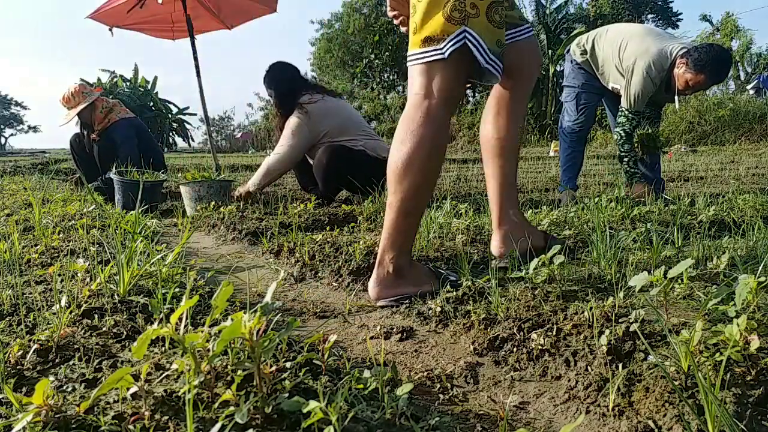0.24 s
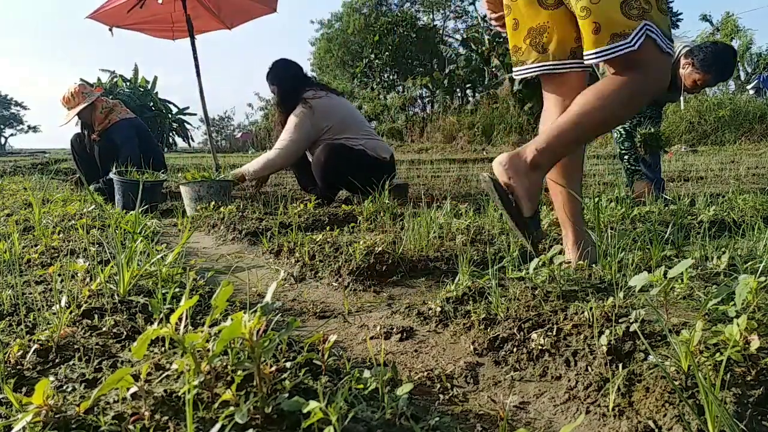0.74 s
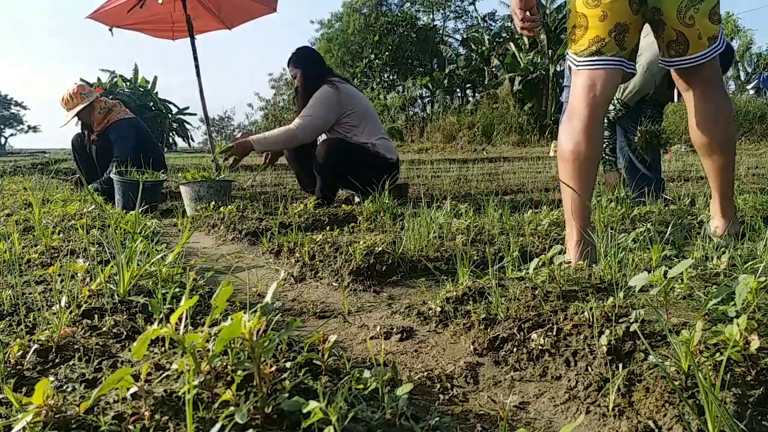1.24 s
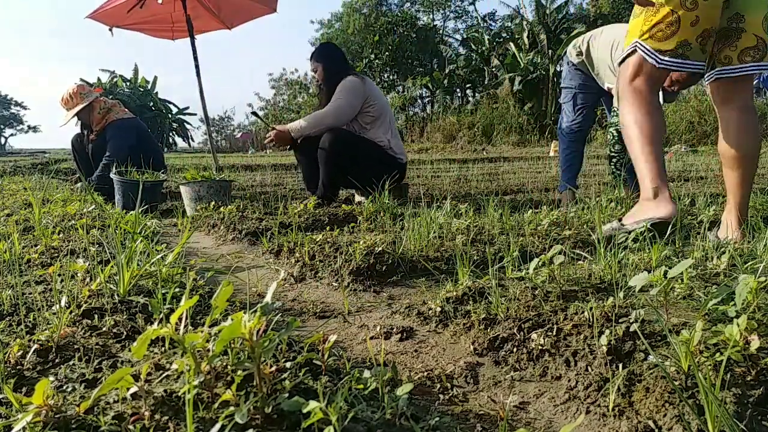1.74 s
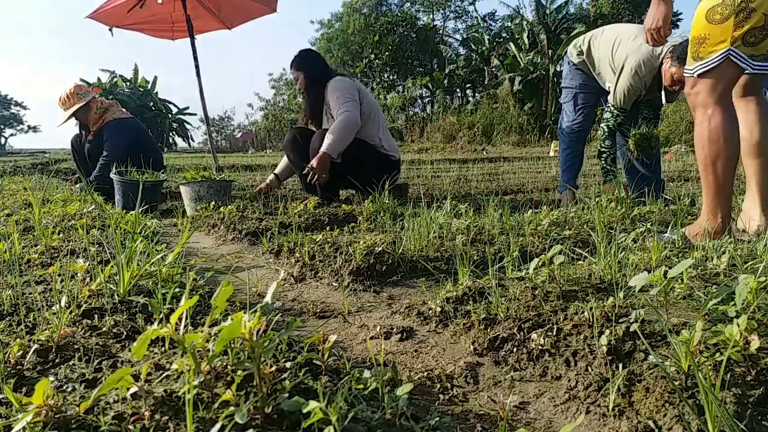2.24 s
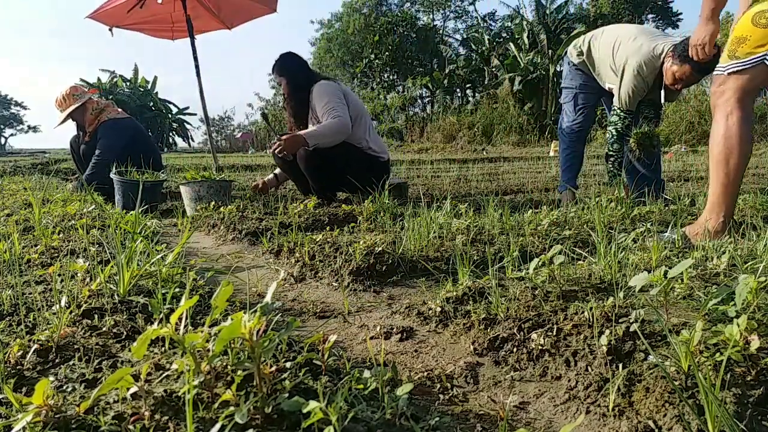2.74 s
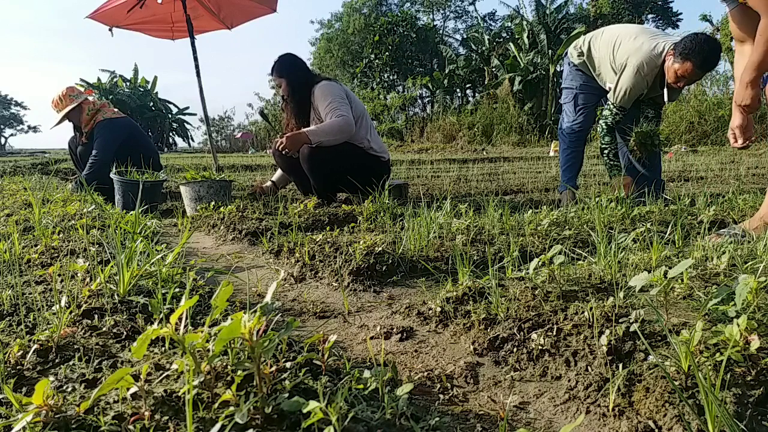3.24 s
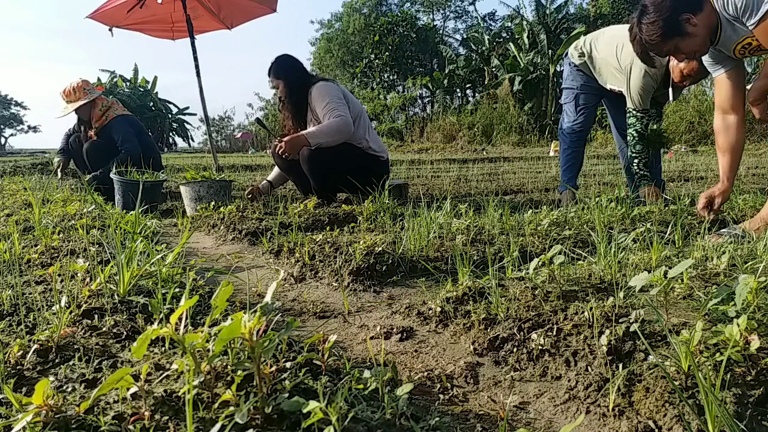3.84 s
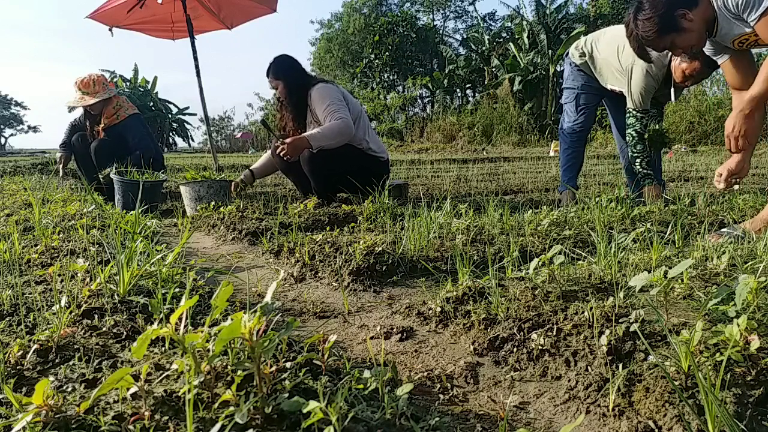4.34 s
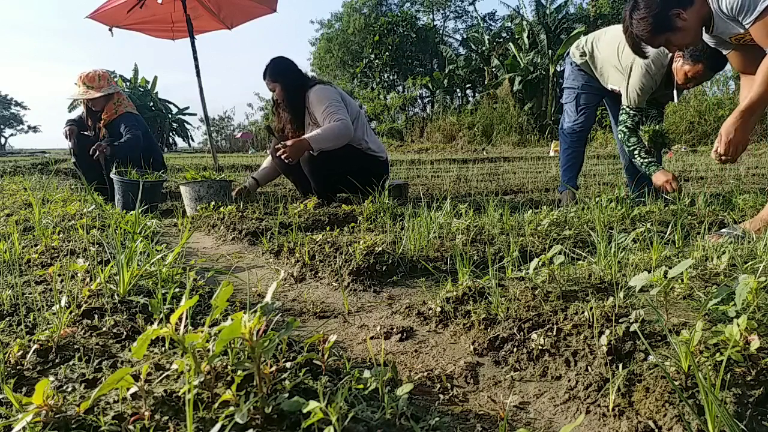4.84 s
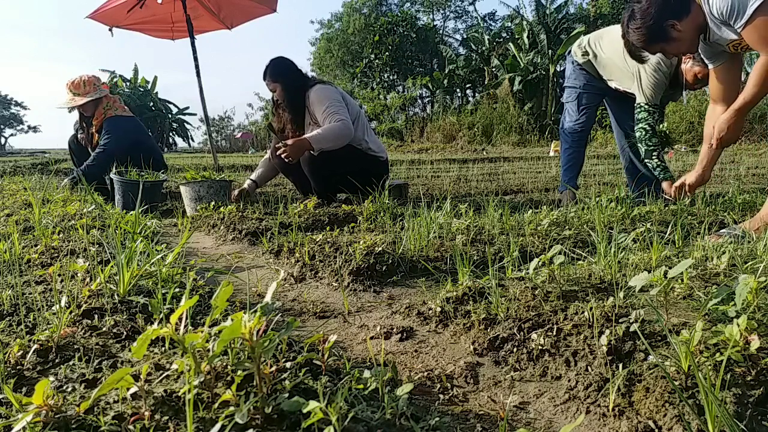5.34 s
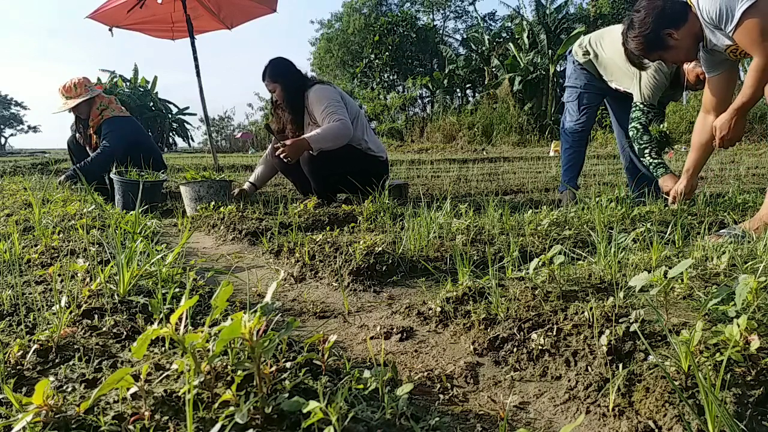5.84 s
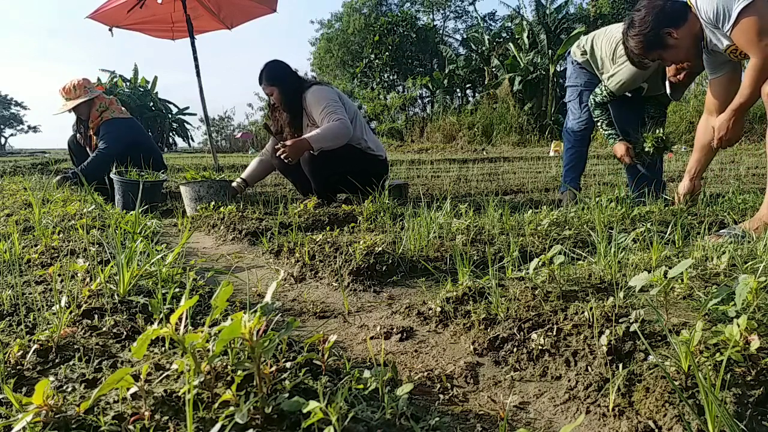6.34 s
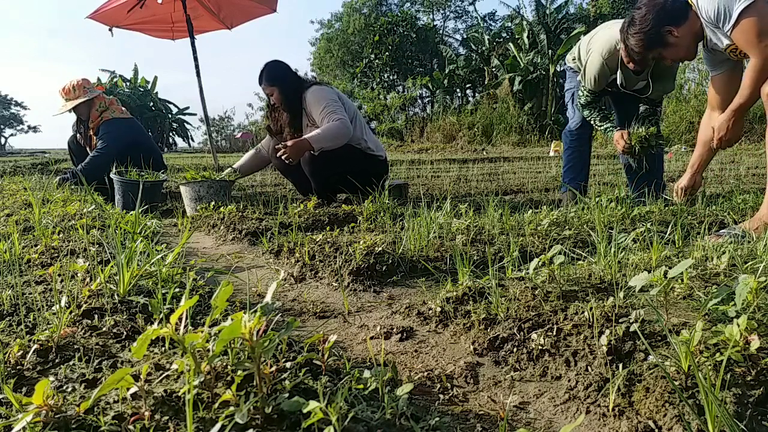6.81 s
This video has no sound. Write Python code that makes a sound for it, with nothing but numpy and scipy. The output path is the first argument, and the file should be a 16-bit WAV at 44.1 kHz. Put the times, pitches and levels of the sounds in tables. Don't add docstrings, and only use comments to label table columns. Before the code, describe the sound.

A buzzing small engine dominates at first, hum and gassy roar mixed with rattling panels, while stalks crack near the microphone. It gradually slows and softens, and leaves rustle close by around three seconds. The idle falters with missed firings, then the engine catches and rises unevenly, its drive whining. A short bird twitter and chattering loose bracket come late. Open field, wide stereo phone pickup, high thin insect song and light hiss.

```python
import sys
import numpy as np
from scipy import signal
from scipy.fft import rfft, irfft
from scipy.io import wavfile
from scipy.ndimage import uniform_filter1d, map_coordinates

SR = 44100
rng = np.random.default_rng(int(sys.argv[2]) if len(sys.argv) > 2 else 0)


def undo_db(level):
    steps = np.asarray(level, float) / 20
    return 10 ** steps


def store_pcm(level_fs):
    pcm = np.round(np.clip(level_fs, -1, 1) * 32767).astype(np.int16)
    wavfile.write(sys.argv[1], SR, np.atleast_2d(pcm).T)


N = 311787
T = np.arange(N) / SR
HZ = np.maximum(np.fft.rfftfreq(N, 1 / SR), 1)

# f/Hz, spectral level/dB
HISS = [(40, -9), (300, -47), (1500, -6.5), (4000, -7), (6400, -14), (8000, -8), (15500, -8.5)]
# f/Hz, gain/dB
LEFT_PORT = [(50, .1), (130, -1), (300, -.9), (700, .6), (1200, 1), (1720, -5), (2400, -2), (3300, -3),
             (5000, -7), (6900, 1), (7600, 3), (9000, 0)]
# f/Hz, direct share/1
DIRECT = [(60, 0.98), (130, .97), (350, 0.995), (700, .97), (1200, 0.88), (1700, 0.82), (2400, 0.67),
          (3300, 0.55), (4300, 0.5), (7000, 0.17)]
# t/s, start f/Hz, end f/Hz, length/s, level/dB
BIRD = [
    (5.824, 3700, 2880, 0.024, -42),
    (5.843, 3380, 3730, 0.016, -47),
    (5.863, 2950, 3400, 0.0049, -44),
    (5.871, 3690, 2920, 0.0155, -47),
    (5.891, 2780, 3230, .014, -53),
    (5.907, 3130, 3320, 0.0091, -46),
    (5.918, 3500, 2950, .015, -49),
]
# f/Hz, spectral level/dB
BRUSH_COLOUR = [(1600, -4), (2900, -0.5), (3300, 7), (4100, 6), (5200, 4.5), (6500, -7.5), (7800, -4.5),
                (9500, 0), (14000, -39)]
# peak t/s, level/dB, swell/s, fade/s
STROKES = [(0.459, -43, 0.028, 0.054), (2.06, -57, .03, .06), (2.178, -62, .015, 0.021),
           (2.286, -52.5, 0.2, 0.026), (2.474, -52.5, 0.22, 0.12), (2.552, -55, 0.027, 0.038),
           (2.825, -55, 0.025, 0.15), (2.973, -44.5, 0.056, 0.02), (3.178, -41, 0.047, 0.018),
           (3.198, -37, .004, .004), (3.212, -41, 0.012, 0.0083), (3.23, -57, 0.019, 0.036)]
# t/s, peak level/dB, left-right level/dB, ring start f/Hz, ring end f/Hz, ring share/1
SNAPS = [
    (.4415, -19.5, -3, 4500, 5000, 0),
    (.4565, -31, -2, 3200, 3600, .2),
    (1.4603, -22, -1, 3900, 3400, .75),
    (1.4606, -27, -1, 1600, 1500, .6),
    (1.493, -35, -1, 5000, 5000, .9),
    (1.4628, -25.5, -1, 2800, 3500, 1),
    (2.8215, -40, -5, 4500, 5000, .1),
    (3.1965, -34, -2, 3200, 3600, .2),
]
# t/s, f/Hz, level/dB
WHINE = [(3.1, 445, -62), (3.3, 432, -48.5), (3.62, 420, -52.5), (3.72, 415, -68.5), (5.2, 400, -76),
         (5.36, 405, -43), (5.45, 420, -45), (5.65, 437, -44), (6.0, 430, -45), (6.3, 407, -41),
         (6.6, 404, -50), (6.8, 412, -46), (7.07, 430, -37.5)]
# t/s, f/Hz, level/dB
BRACKET = [(6.15, 3580, -58), (6.206, 3480, -47), (6.19, 3300, -53), (6.24, 3050, -53), (6.27, 3600, -54),
           (6.174, 2720, -61), (6.188, 2840, -53), (6.206, 2820, -48), (6.217, 2800, -51),
           (6.23, 2560, -54), (6.25, 2550, -52), (6.273, 2380, -50.5), (6.294, 2420, -49),
           (6.332, 3670, -54), (6.316, 2400, -47), (6.378, 3700, -54)]
# t/s, peak level/dB, panel f/Hz
KNOCKS = [(0.0657, -32, 1800), (0.0992, -31, 1770), (0.1311, -32, 1550), (0.165, -29, 1760),
          (0.1974, -32, 1730), (0.2299, -28, 2030), (0.4244, -26, 1910), (0.6205, -23, 1580),
          (1.0848, -29, 1730), (1.1187, -28, 1560), (1.1531, -30, 2030), (1.2045, -29, 1530),
          (1.2239, -22, 1810), (1.2569, -27, 1750), (1.2928, -27, 2040), (1.3462, -30, 2050),
          (1.5422, -33, 1690), (1.6515, -33, 1710), (1.7059, -35, 1630), (2.4661, -33.5, 1580),
          (2.533, -41, 1650), (2.6233, -42, 1670), (2.7166, -34, 1570), (2.739, -39, 1580),
          (4.7314, -52, 2180), (4.7754, -50, 1580), (5.3471, -46, 2310), (5.382, -45, 2790),
          (5.4439, -45, 1540), (5.4733, -40, 2330), (5.5047, -38, 2340), (5.594, -36, 1660),
          (5.6225, -33, 1900), (5.6474, -37, 2340), (5.6758, -36, 1680), (5.7033, -37, 2260),
          (6.1438, -42, 2200), (6.1732, -35, 1760), (6.2061, -34, 1630), (6.4281, -37, 2370),
          (6.463, -38, 2330), (6.5281, -42, 1570), (6.5568, -38, 2370), (6.6556, -42, 1510),
          (6.689, -37, 1570), (6.692, -38, 2850), (6.7195, -42, 2310), (6.7521, -42, 2260),
          (6.7853, -37, 1700), (6.8162, -40, 1940), (6.8344, -41, 2470), (6.909, -43, 1690),
          (6.94, -35, 2380), (7.0614, -39, 2820)]
# f/Hz, width/Hz, level part that grows with speed/dB, level part that shrinks with speed/dB
PANELS = [(1290, 90, -14, -5), (1080, 130, -15, -2), (1583, 110, 3, 0.5), (1790, 170, 3.5, -3),
          (2075, 55, 3.5, -7), (2370, 150, -7, -2.5), (2560, 65, 5, -18), (2800, 120, -7, -4),
          (3110, 90, .5, -16), (3620, 150, -12, -3)]
# f/Hz, spectral level/dB
CLATTER = [(700, -79), (1000, 6), (1500, 0.5), (2200, -8), (3000, -5.5), (3900, -2.5), (4400, -19),
           (8000, -89)]
# t/s, peak level/dB, f/Hz
BARKS = [(0.015, -26, 640), (0.057, -27, 611), (0.096, -33, 490), (0.146, -16.5, 657), (0.196, -23, 680),
         (0.276, -18, 622), (0.344, -19, 690), (0.424, -32, 645), (0.457, -33, 626), (0.555, -23, 480),
         (0.62, -24, 630), (0.659, -26, 510), (0.733, -26, 615), (0.799, -25, 509), (0.865, -27, 649),
         (0.931, -29, 500), (1.017, -20, 654), (1.056, -26, 638), (1.117, -16.5, 620), (1.227, -17, 620),
         (1.298, -35, 630), (1.329, -19, 482), (1.37, -34, 625), (1.424, -35, 694), (1.472, -29, 590),
         (1.544, -23, 617), (1.616, -24, 608), (1.663, -21, 633), (1.724, -23, 527), (1.782, -22.5, 606),
         (1.843, -26, 517), (1.94, -25, 563), (2.04, -22, 480), (2.184, -33, 635), (2.536, -32, 603),
         (2.611, -25, 570), (2.671, -25, 606), (2.716, -20, 594), (2.811, -26, 630), (2.907, -26, 590),
         (4.775, -37, 560), (5.413, -28, 576), (5.506, -22.5, 596), (5.54, -24.5, 570), (5.591, -25, 646),
         (6.176, -29, 573), (6.333, -32, 590), (6.404, -30, 641), (6.462, -24, 643), (6.532, -25, 640),
         (6.59, -42, 579), (6.658, -25, 600), (6.69, -22, 600), (6.752, -33, 567), (6.829, -23.5, 700),
         (6.915, -23, 595)]
# t/s, turns per second/Hz
SPEED = [(0.0, 61.53), (0.5, 61.31), (1.0, 60.07), (1.25, 56.37), (1.5, 56.45), (1.75, 52.63), (2.0, 49.21),
         (2.75, 42.94), (3.5, 35.31), (4.3, 25.72), (4.5, 26.48), (4.8, 28.77), (5.25, 29.44),
         (5.75, 37.26), (6.0, 32.75), (6.25, 31.25), (6.6, 30.94), (7.07, 32.29)]
# t/s, gas flow as roar level/dB, strain as clatter level/dB, firmness as hum against flow/dB
LOAD = [(0.0, -27, -45.5, 1.5), (0.6, -25.5, -39, 1.5), (1.3, -26, -42, 2.5), (1.72, -26.5, -49.5, 1),
        (1.8, -27, -53.5, -2.5), (2.43, -31.5, -58, -7.5), (2.49, -29, -50.5, -4), (2.93, -30, -56, -2.5),
        (3.03, -34.5, -61.5, -5), (3.65, -39.5, -85, 0), (4.3, -45.5, -68, 7), (4.84, -35.5, -70, 2),
        (5.3, -37.5, -65.5, -2.5), (5.38, -33.5, -53, -5.5), (5.7, -31.5, -44, 2.5), (5.78, -34.5, -67, -2),
        (6.17, -32, -48.5, -1.5), (7.07, -32.5, -52, -2.5)]
# t/s, length/s, loss/dB
MISSES = [(2.096, 0.11, 2), (2.762, 0.022, 1), (2.86, 0.035, 0.5), (3.693, 0.28, 7.5), (3.72, 0.023, 1),
          (4.335, .03, 2), (4.06, 0.066, 2), (4.157, 0.051, 4), (4.202, .03, 2.5), (4.27, 0.098, 3.5),
          (4.385, 0.07, -2), (4.467, 0.016, -3.5), (4.491, 0.053, -4), (4.57, 0.063, 3), (4.718, 0.137, -1),
          (4.891, 0.073, 4), (4.975, 0.11, 4), (5.1, .08, 0), (5.2, 0.1, 0), (5.428, .04, 2),
          (5.78, .05, -1), (5.828, 0.056, -2), (5.9, 0.038, 3), (6.01, 0.11, 3), (6.52, .05, 0.5),
          (6.618, 0.022, 2)]
# f/Hz, width/Hz, level/dB
HUM = [(55.3, 1.6, -7.5), (63.8, 5.3, -1.5), (90.5, 8.8, 2), (126.8, 22, -6.5), (162.3, 7.1, -7.5),
       (201.1, 5.3, 1), (243.8, 6, -7), (319, 17, -2)]
ORDER_DB = [-1, 2.5, -0.5, -3, -4.5]
# f/Hz, spectral level/dB
ROAR = [(24, -39), (40, -60), (64, 4.5), (87, -2), (218, -5), (285, -6), (384, -7.5), (524, -13.5),
        (600, -7), (728, -18.5), (844, -14.5), (1040, -18.5), (1400, -20), (1820, -31), (3080, -120)]
# f/Hz, width/Hz, level/dB
PIPE = [(164, 26, -2), (266.6, 4.7, -5.5), (303.4, 15.7, -3), (430, 34, -9), (654, 152, -6),
        (951, 3.9, -19)]


def rms_one(x):
    return x / np.sqrt(np.mean(x ** 2) + 1e-20)


def in_time(rows):
    s, *columns = np.transpose(rows)
    return [np.interp(T, s, c) for c in columns]


def at_hz(points, hz):
    points_hz, values = np.transpose(points)
    return np.interp(np.log(hz), np.log(points_hz), values)


def colour(x, points):
    return irfft(rfft(x) * undo_db(at_hz(points, HZ)), N)


def butter(x, order, hz, kind="band"):
    return signal.sosfilt(signal.butter(order, hz, kind, fs=SR, output="sos"), x)


def resonate(x, hz, width_hz):
    r = np.exp(-np.pi * width_hz / SR)
    zeros = np.array([1, 0, -1]) * (1 - r * r) / 2
    poles = [1, -2 * r * np.cos(2 * np.pi * hz / SR), r * r]
    return signal.lfilter(zeros, poles, x)


def drift(rate_hz):
    knots = rng.standard_normal(int(N / SR * 60) + 3)[:int(N / SR * rate_hz) + 3]
    coarse = T[::32]
    return np.interp(T, coarse, map_coordinates(knots, [coarse * rate_hz], order=3))


def twin_noise():
    return rng.standard_normal((2, N))


def scattered(x):
    return np.array([x, -np.roll(x, 37)])


def ports(paths, lag, direct):
    direct = np.clip(direct, 0, 1)
    bass_phase = 0.24 / (1 + (HZ / 210) ** 2)
    late = direct * np.exp(-2j * np.pi * HZ * lag / SR - 1j * bass_phase) * rfft(paths[0])
    left = (late + np.sqrt(1 - direct ** 2) * rfft(paths[1])) * undo_db(at_hz(LEFT_PORT, HZ))
    return np.array([irfft(left, N), paths[0]])


def insects(level_db):
    band = butter(twin_noise(), 3, [7300, 7950])
    return undo_db(level_db + 1.0 * drift(26)) * rms_one(band) * undo_db([[4.0], [-5.0]])


def bird():
    out = np.zeros(N)
    for s, start_hz, end_hz, length, level_db in BIRD:
        i, n = round(s * SR), round(length * SR)
        phase = 2 * np.pi * np.cumsum(np.linspace(start_hz, end_hz, n)) / SR
        out[i:i + n] += undo_db(level_db) * np.hanning(n) * np.sin(phase)
    out = out * undo_db(2.5 * drift(65))
    return out + undo_db(-14.0) * np.roll(out, 500)


def feet():
    stroke = np.zeros(N)
    for s, db, swell, fade in STROKES:
        shape = np.minimum(1 + (T - s) / swell, 1 - (T - s) / (2.4 * fade))
        stroke += undo_db(db) * np.clip(shape, 0, 1) ** 2
    grain_db = 4 * np.minimum(rng.exponential(1, N), 4) + 3.5 * drift(60)
    grain = twin_noise() * undo_db(grain_db)
    return rms_one(colour(grain, BRUSH_COLOUR)) * uniform_filter1d(stroke, size=250) * undo_db(5.0)


def snaps():
    out, t = np.zeros((2, N)), np.arange(260) / SR
    for s, peak_db, pan_db, start_hz, end_hz, share in SNAPS:
        i = round(s * SR)
        crack = (1 - .6 * share) * rng.standard_normal(260) * np.exp(-t / .0006)
        phase = 2 * np.pi * np.cumsum(np.linspace(start_hz, end_hz, 260)) / SR
        crack += share * np.exp(-t / .0028) * np.sin(phase)
        out[:, i:i + 260] += undo_db(peak_db - 5.5 + pan_db * np.array([[.5], [-.5]])) * crack
    return butter(out, 1, [1300, 15000])


def whine():
    hz, level_db = in_time(WHINE)
    fade = np.clip((T - WHINE[0][0]) / 0.1, 0, 1)
    level = np.sqrt(2) * fade * undo_db(level_db + 0.5 + 1.5 * drift(18))
    return level * np.sin(2 * np.pi * (np.cumsum(hz) / SR + 0.09 * drift(30)))


def bracket():
    out, t = np.zeros(N), np.arange(900) / SR
    shape = (t / 0.0023) * np.exp(-t / 0.0026)
    for s, hz, level_db in BRACKET:
        i = round(s * SR)
        out[i:i + 900] += undo_db(level_db + 21.0) * shape * np.sin(2 * np.pi * hz * t)
    return out * undo_db(2.2 * drift(60) - 2)


def knocks():
    out, t = np.zeros(N + 1500), np.arange(1500) / SR
    shape = (1 - np.exp(-t / .0008)) * np.exp(-t / .0045)
    shape = shape / shape.max()
    neighbours = rng.integers(2, len(PANELS) - 3, (len(KNOCKS), 2))
    for (s, db, hz), (a, b) in zip(KNOCKS, neighbours):
        i = round(s * SR)
        others = np.sin(2 * np.pi * PANELS[a][0] * t) - np.sin(2 * np.pi * PANELS[b][0] * t)
        ring = np.sin(2 * np.pi * hz * t) + undo_db(-11) * others
        out[i:i + 1500] += undo_db(db - 4.5) * shape * ring
    return out[:N]


def per_turn(turns, spread_db, idle_db):
    k = turns.astype(int)
    return undo_db(spread_db * rng.standard_normal(420)[k] + idle_db * (k % 2))


def clatter(speed, turns, clatter_db, air_db):
    strength = per_turn(turns, spread_db=.7, idle_db=-2.0)
    burst = (.3 + np.clip(1.5 - speed / 30, 0, .2) + np.exp(-(turns % 1) / .14)) * strength
    knock = np.diff(np.floor(turns), prepend=0) * strength
    shake = [twin_noise() * burst, twin_noise() * burst]
    fast = np.clip(speed / 30 - 1, 0, 1)
    panels = 0
    for k, (hz, width, fast_db, slow_db) in enumerate(PANELS):
        level_db = fast * fast_db + (1.5 - fast) * slow_db + (2.0 - 1.2 * fast) * drift(13)
        force = shake[k % 2] + speed / 4.2 * knock * (1 + .4 * drift(40))
        panels = panels + undo_db(level_db) * resonate(resonate(force, hz, 2.5 * width), hz, 1.5 * width)
    broad = rms_one(colour(shake[0][::-1], CLATTER))
    air = butter(twin_noise() * (0.43 + burst), 4, [3300, 5900])
    metal = rms_one(panels) + .5 * broad
    return undo_db(clatter_db + 2.5) * metal + undo_db(air_db - 7.0) * rms_one(air)


def barks():
    out, t = np.zeros(N + 2000), np.arange(2000) / SR
    shape = (1 - np.exp(-t / 0.00078)) * np.exp(-t / 0.0065)
    shape = shape / shape.max()
    front = 0.33 * np.exp(-t / 0.00065) * np.sin(2 * np.pi * 1900 * t)
    for s, db, hz in BARKS:
        i = round(s * SR)
        out[i:i + 2000] += undo_db(db - 5) * (shape * np.sin(2 * np.pi * hz * t) + front)
    return out[:N]


def misses():
    falter_s, catch_s = 0.037, 0.0057
    lost_db = np.zeros(N)
    for s, length, depth_db in MISSES:
        gate = np.minimum((T - s) / falter_s + .5, (s + length - T) / catch_s + .5)
        lost_db += depth_db * np.clip(gate, 0, 1)
    return lost_db


def pipe_db(hz):
    power = sum(undo_db(2 * db) / (1 + (2 * (hz - top_hz) / width) ** 2) for top_hz, width, db in HUM)
    return 10 * np.log10(power)


def exhaust_orders(speed, turns, orders_db, roar_db):
    uneven = turns + .02 * np.clip((45 - speed) / 10, 0, 1) * drift(14)
    out = np.zeros(N)
    for k, level, start in zip([1, 2, 3, 4, 5], orders_db, [0.098, 0.26, 0.51, 0.26, 0.89]):
        out += np.sqrt(2) * undo_db(level + 0.27 * k * drift(23)) * np.sin(2 * np.pi * (k * uneven + start))
    for k in [2.5, 3.5, 4.5, 5.5, 6, 7, 8]:
        half_order_loss = 6.7 * (k % 1 > 0)
        level = roar_db + at_hz(ROAR, k * speed) - 8.5 - half_order_loss + 4.4 * drift(7.8)
        out += undo_db(level) * np.sin(2 * np.pi * (k * turns + 0.043 * k * drift(9) + rng.random()))
    return out


def exhaust(speed, turns, orders_db, bass_db, roar_db):
    orders = exhaust_orders(speed, turns, orders_db, roar_db)
    puff = (1.6 + 0.12 * np.cos(2 * np.pi * turns)) * per_turn(turns + .5, spread_db=1.0, idle_db=-1.0)
    gas = twin_noise() * puff
    pipe = sum(undo_db(level) * rms_one(resonate(gas, hz, width)) for hz, width, level in PIPE)
    roar = rms_one(colour(gas, ROAR)) + undo_db(-8.5) * pipe
    rumble = rms_one(butter(gas, 2, [55, 130]))
    rumble = rumble + np.clip((54 - speed) / 8, .15, 1.3) * rms_one(resonate(gas, 64.3, 0.77))
    above = butter(roar, 3, 135, "high")
    dull = butter(above, 1, 470, "low")
    drone = 0.11 * np.clip((52 - speed) / 8, 0, 1) * rms_one(resonate(gas, 269.4, 2.5))
    bright_db = 0.42 * (roar_db + 23.5) + 0.21 * np.clip(np.gradient(speed) * SR, -12, 4.0)
    above = drone + dull + undo_db(bright_db) * (above - dull)
    rumble_db = bass_db - 12.5 - 1.94 * (speed / 30 - 4.0)
    return orders + undo_db(roar_db - 1.0) * above + undo_db(rumble_db) * rumble


def scene():
    speed, = in_time(SPEED)
    speed = uniform_filter1d(speed, size=SR // 10)
    turns = np.cumsum(speed) / SR
    flow_db, strain_db, firm_db = in_time(LOAD)
    lost_db = misses()
    low_db = flow_db - 1.56 * lost_db
    orders_db = [low_db + firm_db + db + pipe_db((k + 1) * speed) for k, db in enumerate(ORDER_DB)]
    roar_db, clatter_db = flow_db - lost_db, strain_db - lost_db
    air_db = -63.5 + 0.55 * (speed - 45) + 0.52 * (clatter_db + 42)
    air_db += 18.5 * np.exp(-((speed - 53.3) / 13) ** 2)

    engine = exhaust(speed, turns, orders_db, low_db + 1, roar_db)
    engine = engine + clatter(speed, turns + 2 - .1, clatter_db, air_db)
    engine = engine + scattered(knocks()) + whine() + scattered(bracket()) + barks()
    song = bird()
    near = ports(feet(), 9, 0.27) + snaps() + ports([song, np.roll(song, 230)], -16, 0.71)
    far = insects(-71.5 + 0.4 * (roar_db + 36.5))
    return ports(engine, 18, at_hz(DIRECT, HZ)) + near + far


def roll_off(x):
    return signal.sosfilt(signal.butter(12, 16200, fs=SR, output="sos"), x)


def record(dry):
    running = np.pad(dry, [(0, 0), (3000, 0)], "reflect")
    cut = butter(running, 4, 45, "high")
    cut = signal.sosfilt(signal.cheby2(6, 17, 8500, fs=SR, output="sos"), cut)
    hiss = np.array([rms_one(colour(rng.standard_normal(N), HISS)) for side in dry]) * undo_db(-61.0)
    top = signal.cheby2(14, 60, 15750, fs=SR, output="sos")
    heard = signal.sosfilt(top, cut)[:, 3000:] + signal.sosfilt(top, hiss)
    return roll_off(heard)


dry = scene()
out = record(dry)
store_pcm(out)
```